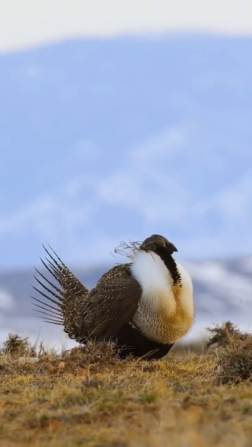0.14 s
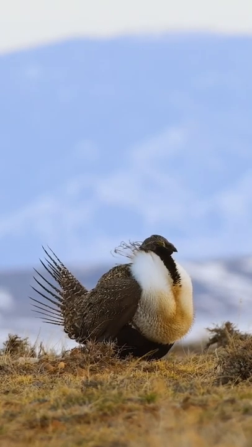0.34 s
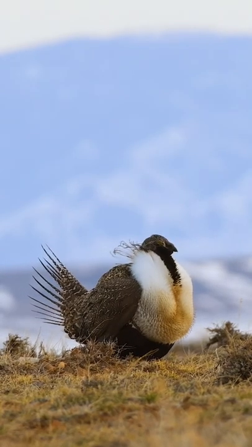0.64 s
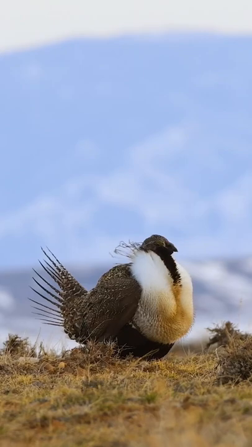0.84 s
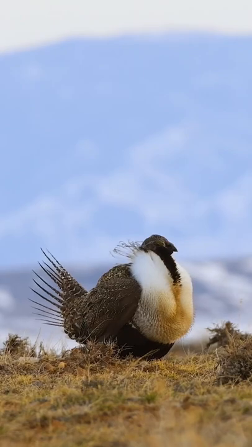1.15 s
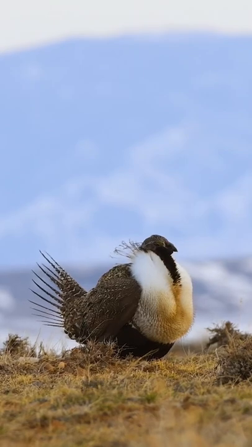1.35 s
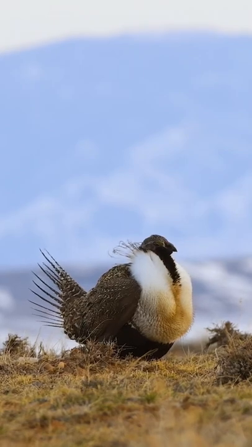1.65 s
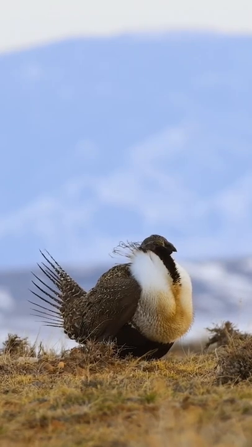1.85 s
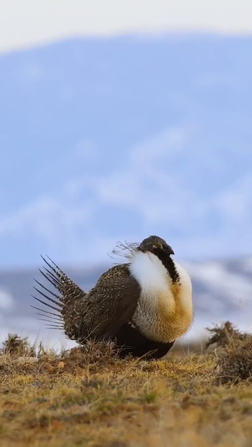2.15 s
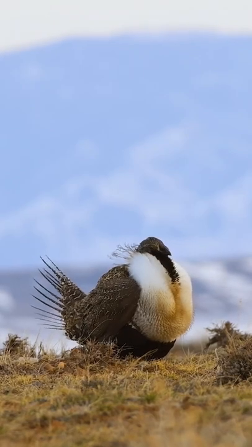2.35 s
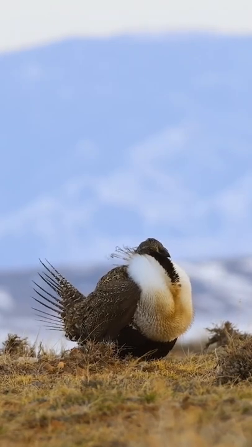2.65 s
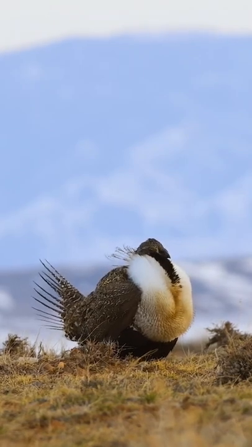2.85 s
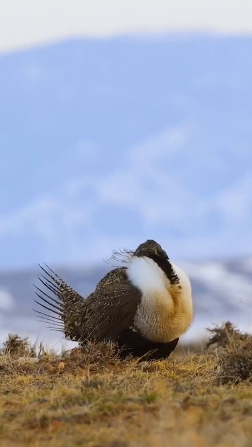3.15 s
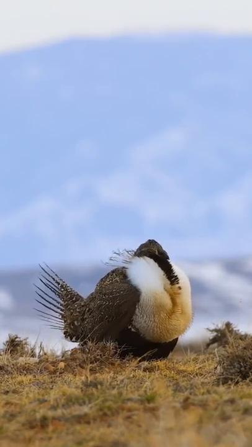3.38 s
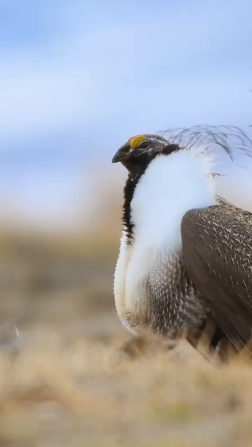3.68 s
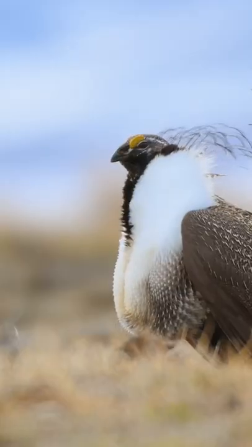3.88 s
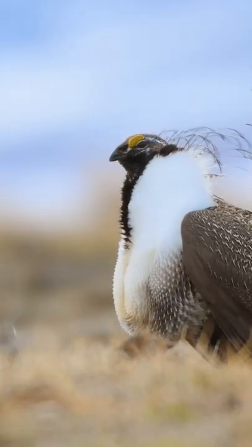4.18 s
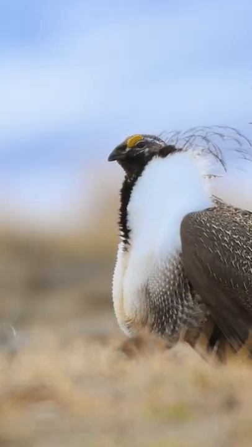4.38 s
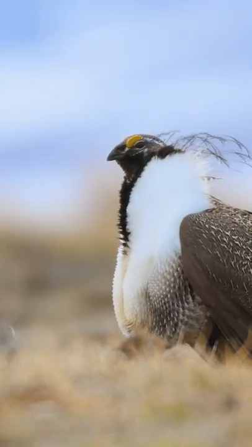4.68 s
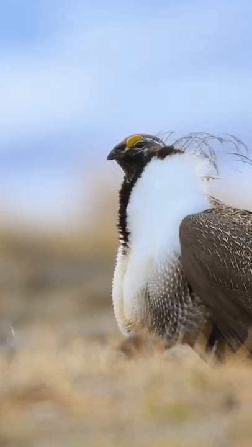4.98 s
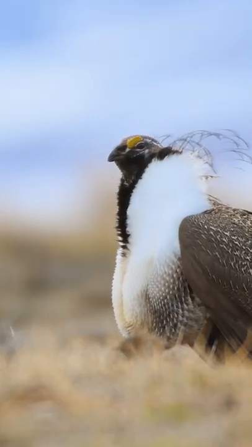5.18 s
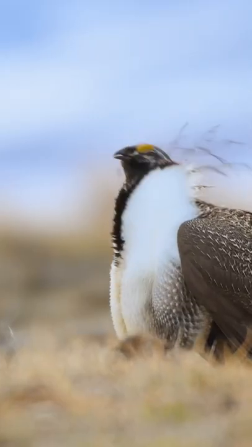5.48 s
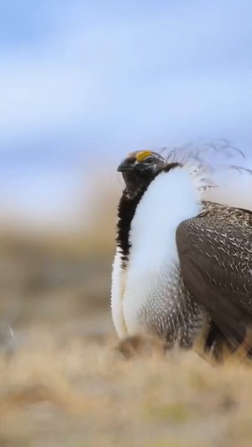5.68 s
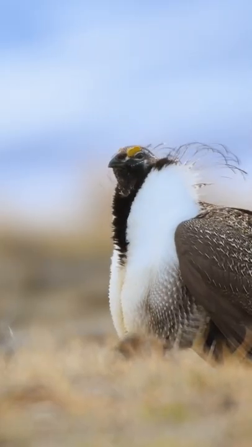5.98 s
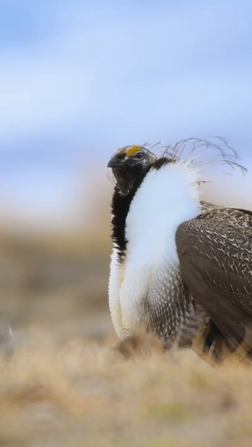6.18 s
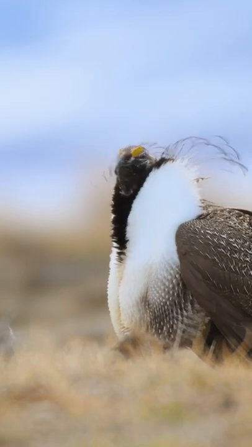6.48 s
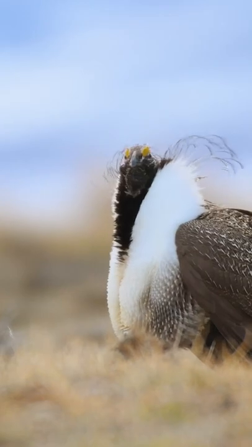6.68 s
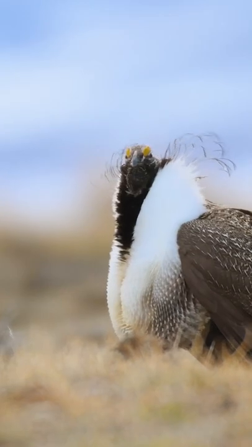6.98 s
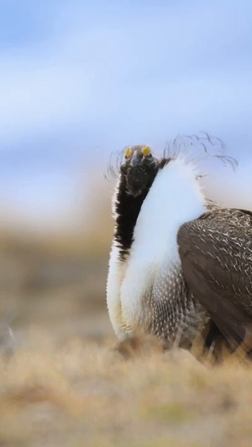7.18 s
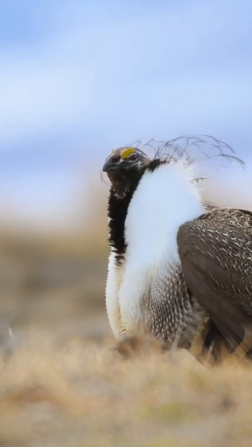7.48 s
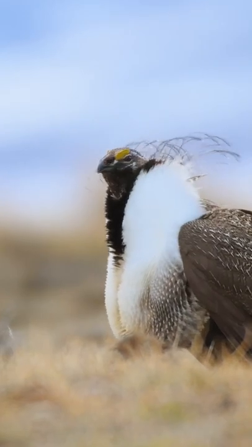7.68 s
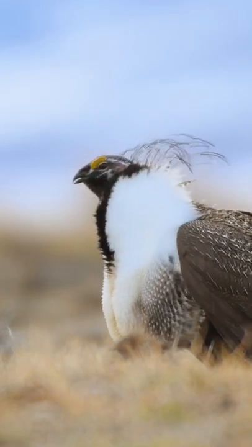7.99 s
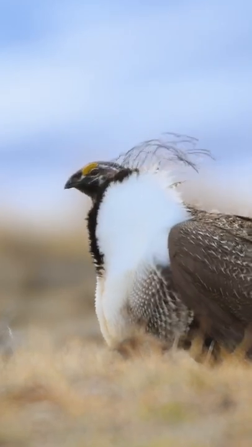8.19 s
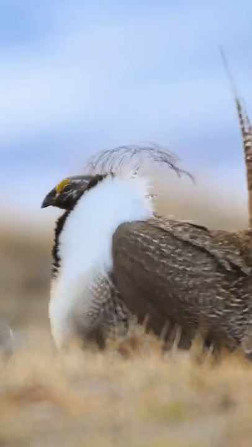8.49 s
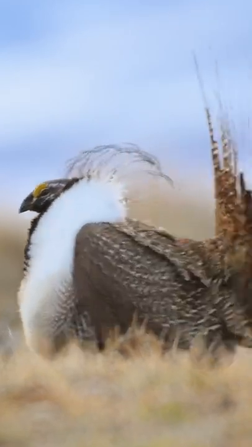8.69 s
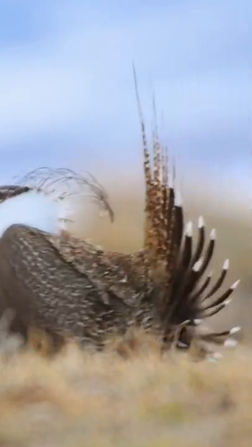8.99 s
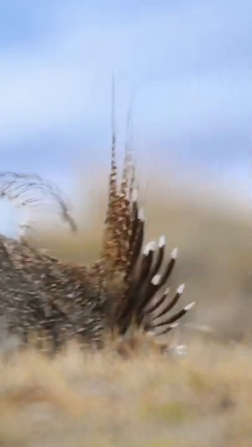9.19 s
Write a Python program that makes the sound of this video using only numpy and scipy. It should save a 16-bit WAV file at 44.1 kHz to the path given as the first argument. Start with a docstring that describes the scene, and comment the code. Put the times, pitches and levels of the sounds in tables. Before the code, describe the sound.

A low, fluttering drone of many distant grouse coos swells and fades throughout on open grassland, with light wind rumble, distant air and faint hiss. Two hollow pops come at 0.1 and 0.3 seconds, then soft single coos at 0.5 and 1.0. Faint chirps and a grainy feather swish pass around 1.8; low wind thumps fall near 2.0 and 2.6. Brighter chirps with swishing cluster at 2.7 to 2.9. The strongest display follows: a snappy pop at 3.3, a tiny arching whistle, and a loud pop at 3.5. A swish comes at 4.1, a coo at 4.5, and two pops at 4.6 to 4.7. High chirps sound at 5.9, weak pops between 6.4 and 7.0, and short coos from 7.4 to 8.1. A dull double knock lands at 8.05, a clear coo at 8.7, pops at 8.8 and 9.0, and a closing feather rasp at 9.3. Nearby sounds leave a short, soft echo.

```python
"""Sage-grouse display on open grassland

The males pop their air sacs, coo, whistle and drag their wings over stiff breast feathers.
Pops, coos and whistles are swelling and fading sine tones; the wing swishes are bands of noise.
Many overlapping far coos merge into one low band. Small birds chirp as short gliding tones.
Light wind rumbles on the microphone as low noise, with two low thumps, over distant air and hiss.
The sagebrush scatters a short, soft echo of the nearer sounds."""
import sys
import numpy as np
from scipy import signal
from scipy.fft import rfft
from scipy.io import wavfile
from scipy.ndimage import uniform_filter1d

SR = 44100
rng = np.random.default_rng(int(sys.argv[2]) if len(sys.argv) > 2 else 0)


def log_audio(samples):
    """Write samples as a 16-bit WAV file to the path given in sys.argv[1]."""
    # one column per channel
    frames = np.atleast_2d(samples).T
    # limit to full scale, then quantise
    limited = np.clip(frames, -1, 1)
    pcm = np.round(limited * 32767).astype(np.int16)
    wavfile.write(sys.argv[1], SR, pcm)


N = 411894  # length of the scene [samples]


def undb(db):
    """Turn decibels into a gain."""
    return 10 ** (np.asarray(db) / 20)


def unit(x):
    """Scale a sound to an rms (average strength) of 1."""
    return x / np.sqrt(np.mean(x ** 2))


def colour(x, points):
    """Filter by a smooth spectrum given as (frequency [Hz], level [dB]); rms 1."""
    hz, db = np.transpose(points)
    f = np.maximum(np.fft.rfftfreq(N, 1 / SR), 1)
    gain = undb(np.interp(np.log(f), np.log(hz), db))
    return unit(np.fft.irfft(rfft(x) * gain, N))


def lowpass(x, hz, order):
    """Cut the treble without shifting the sound in time."""
    return signal.sosfiltfilt(signal.butter(order // 2, hz, fs=SR, output="sos"), x)


def band(count, hz, width_hz):
    """Noise in a steep-sided band around a centre that may move; rms 1."""
    sos = signal.butter(5, width_hz / 2, fs=SR, output="sos")
    noise = rng.standard_normal(2 * count) + 1j * rng.standard_normal(2 * count)
    slow = signal.sosfilt(sos, noise)[count:]  # skip the filter's start-up
    carrier = np.exp(2j * np.pi * np.cumsum(hz * np.ones(count)) / SR)
    return unit((slow * carrier).real)


def add(out, s, x):
    """Mix x into out from time s [s], cut off at the end of the scene."""
    i = max(int(s * SR), 0)
    n = max(min(len(x), N - i), 0)
    out[i:i + n] += x[:n]


def ring(t, hz, swell, steepness=1.44):
    """A tone that swings up within the swell time and dies away, like a struck membrane."""
    envelope = (t / swell * np.exp(1 - t / swell)) ** steepness
    return envelope * np.sin(2 * np.pi * hz * t)


def pops_and_thumps():
    """The air in the sacs rings for a few cycles; two low wind thumps are made the same way."""
    # air-sac pops, and two low wind thumps at 2.035 and 2.563 s:
    # (time [s], pitch [Hz], peak [dB], swell time [s])
    pop_rows = [(0.109, 173, -15.5, 0.0048), (.312, 240, -15, 0.0075), (2.035, 141, -35, 0.021),
                (2.563, 104, -24, 0.0084), (3.246, 230, -19, 0.0063), (3.337, 171, -13, 0.0045),
                (3.528, 271, -9.5, 0.0045), (3.54, 208, -19.5, 0.01), (3.772, 190, -33, 0.0083),
                (4.616, 199, -21, 0.0079), (4.670, 169, -16.5, 0.0076), (6.383, 173, -25, 0.0073),
                (6.567, 216, -25.5, 0.0071), (7.027, 198, -27.5, 0.01), (8.842, 173, -15.5, 0.0056),
                (9.045, 275, -11.5, 0.0086)]
    out, t = np.zeros(N), np.arange(SR // 6) / SR
    for s, hz, db, swell in pop_rows:
        add(out, s, undb(db) * ring(t, hz, swell))
    return out


def snaps(rustle_db=-30, rustle_s=0.043, spread=0.71, top_hz=4200):
    """Skin snaps taut, and the feathers on it rustle briefly."""
    # snaps of skin and feather: (time [s], pitch [Hz], level [dB], swell time [s])
    snap_rows = [(.107, 700, -20.5, 0.00093), (.312, 600, -35, 0.0022), (3.3345, 2310, -13.5, 0.0013),
                 (3.336, 2840, -13, 0.00049), (3.338, 1850, -14.5, 0.00071), (3.3412, 1970, -16, 0.00053),
                 (3.5271, 3050, -13.5, 0.00049), (3.531, 2100, -36, 0.0043), (3.545, 3220, -31, 0.00066),
                 (3.772, 3400, -38, 0.00073), (4.613, 2860, -26, 0.0002), (4.670, 870, -30.5, 0.001),
                 (6.382, 3200, -43, .0004), (8.048, 2820, -30.5, 0.00018), (8.086, 2500, -32, 0.00014),
                 (8.841, 640, -20.5, 0.0015), (9.044, 596, -35, 0.0017)]
    out, t = np.zeros(N), np.arange(SR // 6) / SR
    for s, hz, db, swell in snap_rows:
        snap = ring(t, hz, swell, steepness=2.34)
        rustle = undb(rustle_db) * np.exp(-t / rustle_s) * band(len(t), hz, spread * hz)
        add(out, s, undb(db) * (snap + rustle))
    return lowpass(out, top_hz, order=12)


def coo(length, hz, fall):
    """A soft, pure note that swells and fades while its pitch may glide (fall in octaves a second)."""
    t = np.arange(-length / 2, length / 2, 1 / SR)
    pitch = hz * 2 ** (-fall * t)
    return np.hanning(len(t)) * np.sin(2 * np.pi * np.cumsum(pitch) / SR)


def coos():
    """Single coos that stand out of the lek, the birds' display ground."""
    # nearer coos: (middle [s], length [s], pitch [Hz], fall [octaves/s], peak [dB])
    coo_rows = [(0.526, 0.054, 320, 4.2, -23), (1.01, 0.071, 318, -0.5, -20.5),
                (4.47, 0.044, 513, 1.5, -28), (4.515, 0.075, 503, 3, -19), (7.355, .02, 373, 1, -19.5),
                (7.923, .07, 335, -2.5, -22.5), (7.977, 0.057, 326.5, 0.5, -21),
                (8.101, 0.036, 303, -1, -17.5), (8.134, 0.039, 316, 0, -19.5),
                (8.675, 0.062, 481, 2.2, -14.5)]
    out = np.zeros(N)
    for s, length, hz, fall, db in coo_rows:
        add(out, s - length / 2, undb(db) * coo(length, hz, fall))
    return out


def whistle(hz, gain, waver=0.0075, rasp=0.24, rasp_hz=3200, rasp_width_hz=400):
    """A thin, slightly wavering tone that follows a given pitch and turns rough near rasp_hz."""
    wavering = hz * (1 + waver * band(len(hz), 0, 600))
    tone = np.sin(2 * np.pi * np.cumsum(wavering) / SR)
    rough = rasp * np.exp(-((hz - rasp_hz) / rasp_width_hz) ** 2)
    return gain * (tone + rough * band(len(hz), hz, 650))


def gesture(rows):
    """Start, pitch and gain of a (time [s], pitch [Hz], level [dB]) line, with rounded corners."""
    s, hz, db = np.transpose(rows)
    t = np.arange(s[0], s[-1], 1 / SR)
    pitch = uniform_filter1d(np.interp(t, s, hz), size=150)
    gain = uniform_filter1d(undb(np.interp(t, s, db)), size=90, mode="constant")
    return s[0], pitch, gain * signal.windows.tukey(len(t), .1)  # soft ends


def grouse_whistle():
    """The near male's whistle arches up and down in pitch between his two pops."""
    # the arch: (time [s], pitch [Hz], level [dB])
    arch_rows = [(3.354, 1110, -46), (3.366, 1267, -37), (3.38, 1505, -39), (3.39, 1920, -46),
                 (3.397, 2050, -28), (3.405, 2220, -25.5), (3.413, 2090, -24), (3.418, 1750, -23),
                 (3.421, 1470, -41), (3.437, 746, -49)]
    out = np.zeros(N)
    start, arch, gain = gesture(arch_rows)
    add(out, start, whistle(arch, gain))
    return out


def chirps(taper=.8):
    """Short chirps and thin whistles glide and bend in pitch; taper is the share spent swelling and fading."""
    # chirps: (middle [s], length [s], pitch [Hz], rise [octaves], scoop [octaves], level [dB])
    chirp_rows = [(.19, .06, 5000, 0, -0.11, -56), (0.688, 0.055, 4750, .25, .08, -52),
                  (1.748, .024, 5000, -.13, .02, -48), (1.757, .014, 5540, .1, -0.18, -43),
                  (1.765, .013, 4100, .05, 0.43, -43), (1.775, .018, 5700, .3, -.1, -45),
                  (1.799, 0.095, 2710, -0.25, .1, -45), (1.865, 0.026, 3090, 1, -.14, -36),
                  (1.872, .036, 5630, .1, .03, -52), (2.679, 0.041, 5550, .09, 0.12, -40.5),
                  (2.737, .019, 3730, 0.021, .1, -31.5), (2.751, .018, 4480, .42, .03, -39),
                  (2.775, .028, 6100, .04, 0, -53), (2.813, .022, 3270, -0.14, .09, -22.5),
                  (2.833, 0.025, 2850, 0, .27, -30.5), (2.856, 0.017, 3530, .08, 0.012, -33),
                  (4.689, .04, 1046, 0.14, -.08, -48), (5.874, .022, 4850, .3, .1, -42),
                  (5.873, .014, 3470, -.17, -.04, -39), (5.889, .026, 3800, .65, 0, -44),
                  (5.896, .012, 5660, .03, 0, -44), (5.917, 0.036, 4905, -.02, 0.022, -27),
                  (6.019, .012, 5450, 0, 0, -52), (7.489, .013, 4480, 0, .03, -46),
                  (7.589, .013, 3960, 0, 0, -49)]
    out = np.zeros(N)
    for s, length, hz, rise, scoop, db in chirp_rows:
        u = np.linspace(-1, 1, int(length * SR))
        pitch = hz * 2 ** (rise * u / 2 + scoop * u ** 2)
        gain = undb(db) * signal.windows.tukey(len(u), taper)
        add(out, s - length / 2, whistle(pitch, gain))
    return out


def swishes(width_hz=950, grain_db=2.0, level_db=-3, skirt_db=-10, range_db=17, sag_oct_per_s=.6):
    """Stiff feather tips flick past the wing: a grainy rasp that sinks in pitch as the stroke slows."""
    # wing swishes: (peak time [s], swell [s], fade [s], centre [Hz], level before level_db [dB])
    swish_rows = [(1.7, .11, 0.17, 3200, -42), (1.745, 0.053, 0.093, 2460, -44),
                  (1.775, .04, 0.044, 5030, -45), (1.87, .02, .06, 3100, -39), (2.785, .05, .06, 4150, -35),
                  (2.75, 0.067, 0.095, 3450, -35), (2.83, 0.052, 0.066, 3300, -31),
                  (4.121, 0.093, 0.061, 3400, -41), (4.53, 0.054, 0.053, 3200, -49),
                  (5.88, 0.094, .07, 3550, -44.5), (8.211, .07, 0.076, 3200, -51.5),
                  (8.59, 0.088, 0.095, 3200, -54), (9.22, 0.23, 0.27, 2880, -46.5),
                  (9.335, .08, 0.085, 2770, -39)]
    out = np.zeros(N)
    for s, swell, fade, centre, db in swish_rows:
        t = np.arange(-swell, fade, 1 / SR)
        drop_db = range_db * np.maximum(-t / swell, t / fade)  # below the peak
        gain = undb(db - drop_db) * signal.windows.tukey(len(t), .1)
        hz = centre * 2 ** (-sag_oct_per_s * t)
        flicks = unit(undb(grain_db * band(len(t), 0, 370)))
        skirt = undb(skirt_db) * band(len(t), hz, 2 * width_hz)  # weaker, wider noise
        rasp = band(len(t), hz, width_hz) + skirt
        add(out, s - swell, gain * flicks * rasp)
    return undb(level_db) * out


def knocks(contact_s=0.0028):
    """A dull double knock, like wing beats: soft blows into a few well-damped ringing tones."""
    # knocks: (time [s], level [dB])
    knock_rows = [(8.046, -16.5), (8.083, -15)]
    # what a knock rings with: (frequency [Hz], level [dB], time to fade by 60 dB [s])
    mode_rows = [(104.2, -11, 0.39), (201, -2, 0.1), (646, 1, 0.043), (1090, -14, 0.047)]
    out, t = np.zeros(N), np.arange(SR // 3) / SR
    modes = sum(undb(db - 60 * t / t60) * np.sin(2 * np.pi * hz * t) for hz, db, t60 in mode_rows)
    soft_start = 1 - np.exp(-(t / contact_s) ** 2)
    for s, db in knock_rows:
        add(out, s, undb(db) * modes * soft_start)
    return out


def sagebrush(x, scatter_db=-11.5, t60=0.16, onset_s=0.014, dull_hz=4600):
    """The bushes scatter a short, dull tail behind each sound; t60 is its 60 dB fade time [s]."""
    t = np.arange(SR // 3) / SR
    tail = rng.standard_normal(len(t)) * undb(-60 * t / t60) * (1 - np.exp(-t / onset_s))
    tail = tail / np.linalg.norm(tail)
    echo = signal.fftconvolve(lowpass(x, dull_hz, order=2), tail)[:N]
    return x + undb(scatter_db) * echo


def lek(count=2600, spread_db=3):
    """Many far coos overlap into a fluttering drone."""
    # slow swells of the far lek: (time [s], level [dB])
    swell_rows = [(0.0, -32), (0.6, -28.5), (1.2, -33.5), (1.6, -29.4), (2.8, -33), (3.3, -29), (4.0, -29),
                  (4.6, -31), (5.7, -29), (6.0, -32), (6.6, -28.5), (7.3, -34), (7.6, -27.5), (7.9, -30.5),
                  (8.3, -30.4), (9.0, -35), (9.1, -30.5), (9.32, -31.9)]
    # its colour: (frequency [Hz], level [dB])
    drone_spectrum = [(170, -66), (235, -22), (272, -4), (330, 0.5), (375, -3.5), (420, -6), (465, -22),
                      (560, 6.5)]
    out = np.zeros(N)
    for when, pitch, size, length in rng.random((count, 4)):
        note = undb(spread_db * size) * coo(0.034 + 0.067 * length, 220 + 270 * pitch, 1)
        out[(int(when * N) + np.arange(len(note))) % N] += note  # wraps round at the end
    drone = colour(out, drone_spectrum)
    # even out the loudness over an eighth of a second, then apply the slow swells
    steady = drone / np.sqrt(uniform_filter1d(drone ** 2, size=SR // 8))
    return steady * undb(np.interp(np.arange(N) / SR, *np.transpose(swell_rows)))


def wind(level_db=-2.5, breeze_db=-51.5, buffet_db=1.0, buffet_hz=5):
    """Small gusts swell and die over a light breeze and buffet the microphone with a low rumble."""
    # gusts on top of the breeze: (middle [s], length [s], peak before level_db [dB])
    gust_rows = [(0.267, 0.16, -45), (.55, .16, -40), (1.324, .25, -41), (1.704, .2, -39),
                 (2.02, 0.69, -35.5), (2.574, 0.5, -36), (3.05, .2, -43), (4.75, 0.23, -34),
                 (5.777, 0.26, -31), (5.968, 0.31, -45), (7.37, 0.27, -46), (7.803, 0.13, -41),
                 (8.093, 0.42, -43), (8.68, 0.83, -38), (9.106, 0.47, -36.5)]
    # colour of the rumble: (frequency [Hz], level [dB])
    rumble_spectrum = [(15, -2.5), (38, 3.5), (70, 1.5), (110, -1), (170, -30), (300, -53.5)]
    force = np.full(N, undb(breeze_db))
    for s, length, db in gust_rows:
        add(force, s - length / 2, undb(db) * np.hanning(int(length * SR)))
    buffets = unit(undb(buffet_db * band(N, 0, 2 * buffet_hz)))
    rumble = colour(rng.standard_normal(N), rumble_spectrum)
    return undb(level_db) * force * buffets * rumble


def distant_air(level_db=-44.5):
    """Steady noise, strongest in the low range, stands for the distant air."""
    # colour of the air: (frequency [Hz], level [dB])
    air_spectrum = [(60, -6), (130, -1.5), (190, 5.5), (300, -1.5), (500, -5), (750, -8), (1200, -18),
                    (2000, -21.5), (3400, -25.5), (4300, -28.5), (8000, -35), (15000, -40)]
    return undb(level_db) * colour(rng.standard_normal(N), air_spectrum)


def hiss(level_db=-48.5):
    """Steady microphone hiss, drawn separately for each of two channels."""
    # colour of the hiss: (frequency [Hz], level [dB])
    hiss_spectrum = [(60, 10), (700, 8), (1300, 4), (3500, 3.5), (4500, -0.5), (8700, -1), (9300, -4.5),
                     (15500, -4.5)]
    channels = [colour(rng.standard_normal(N), hiss_spectrum) for _ in range(2)]
    return undb(level_db) * np.array(channels)


def scene():
    """Birds, wind and air lie in the middle; the hiss differs in each channel."""
    calls = coos() + grouse_whistle() + chirps()
    bursts = pops_and_thumps() + snaps() + swishes() + knocks()
    nearby = sagebrush(calls + bursts)
    return nearby + lek() + wind() + distant_air() + hiss()


def record(dry, top_hz=15800):
    """The recorder steeply cuts everything above top_hz."""
    return signal.sosfilt(signal.ellip(10, .1, 80, top_hz, fs=SR, output="sos"), dry)


dry = scene()
out = record(dry)
log_audio(out)
```